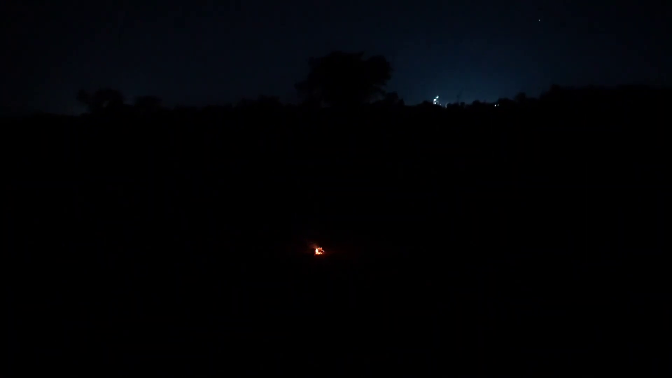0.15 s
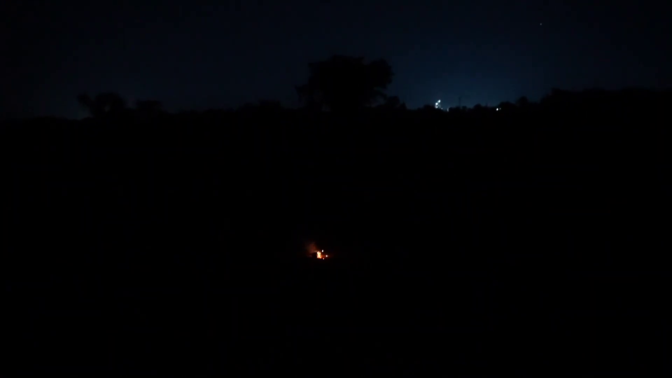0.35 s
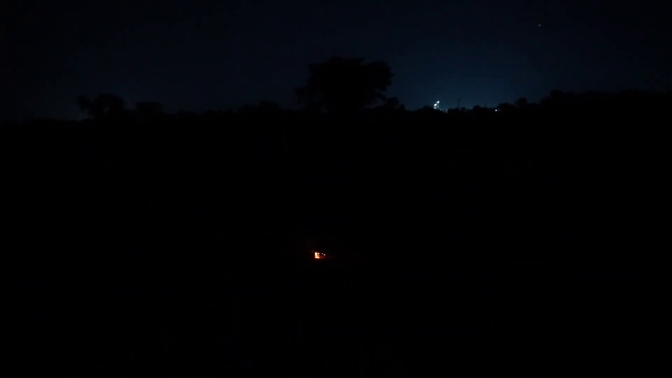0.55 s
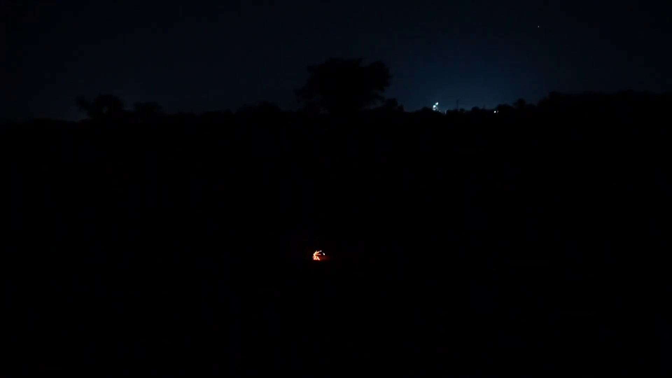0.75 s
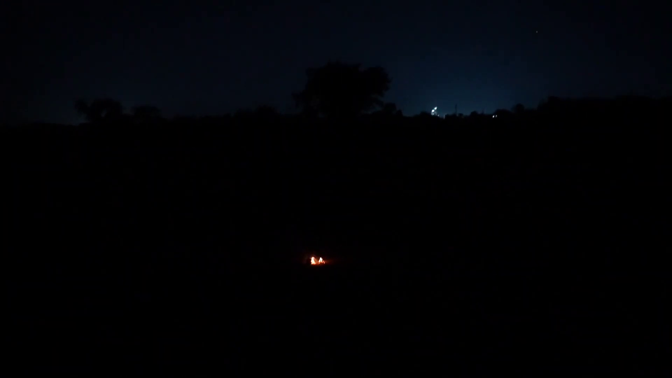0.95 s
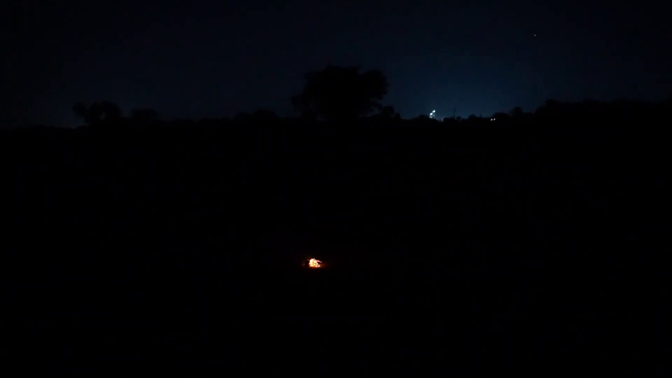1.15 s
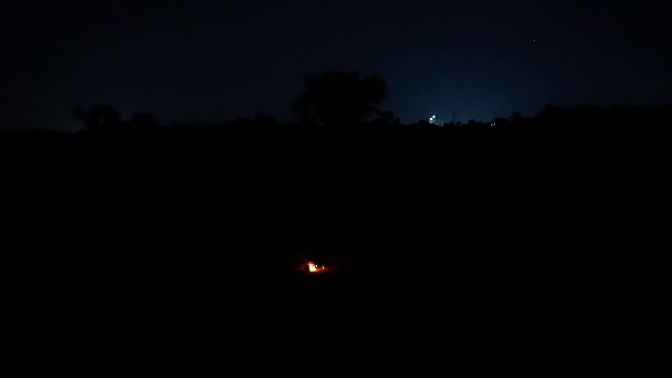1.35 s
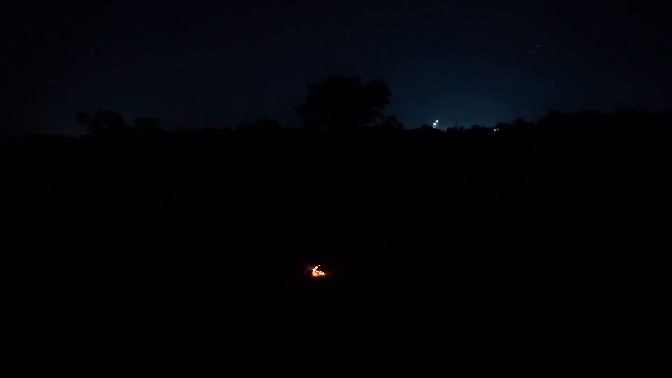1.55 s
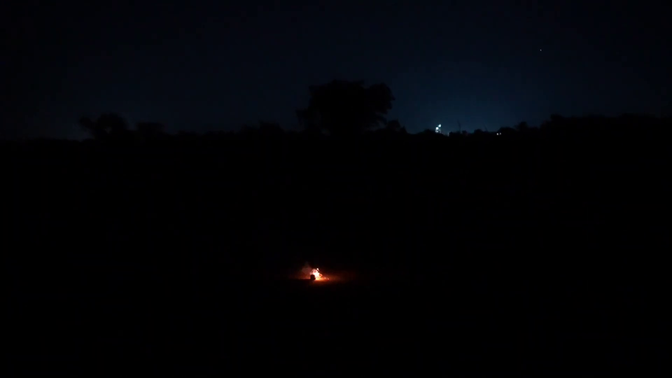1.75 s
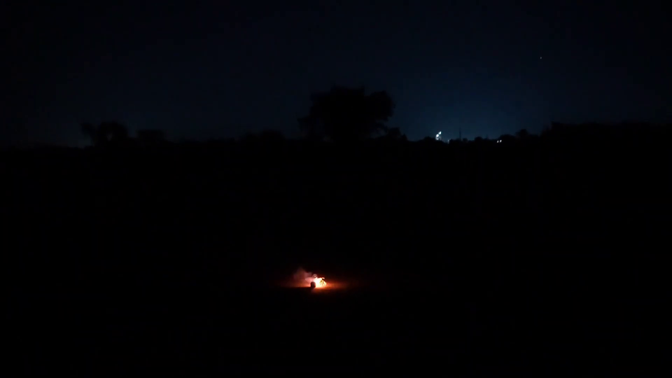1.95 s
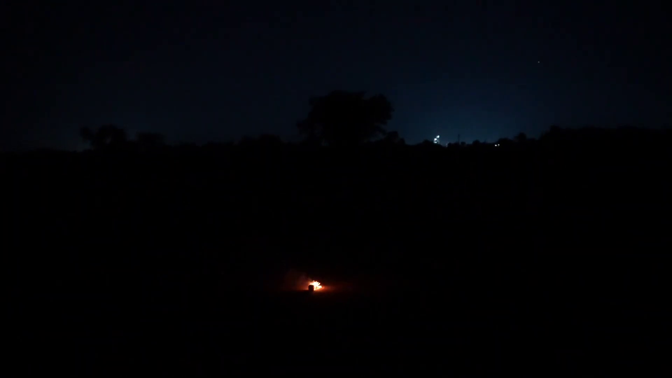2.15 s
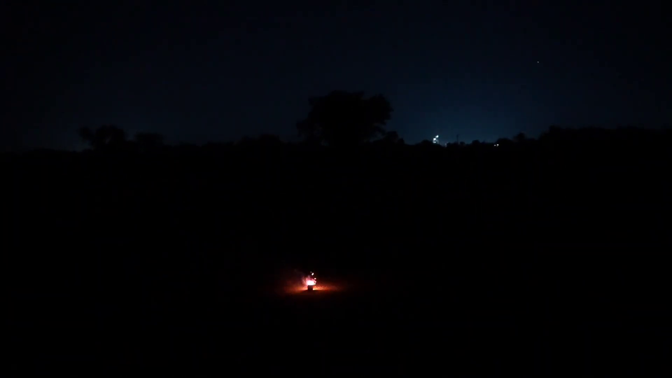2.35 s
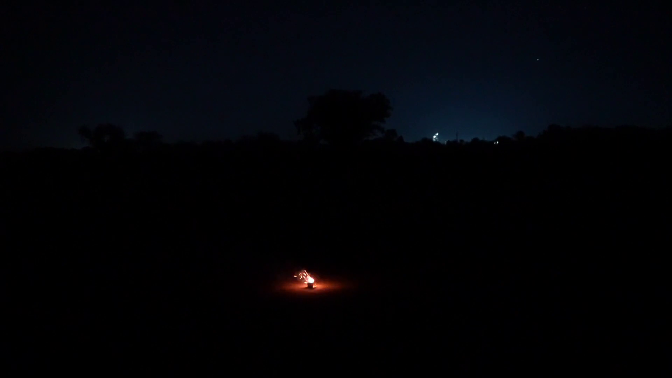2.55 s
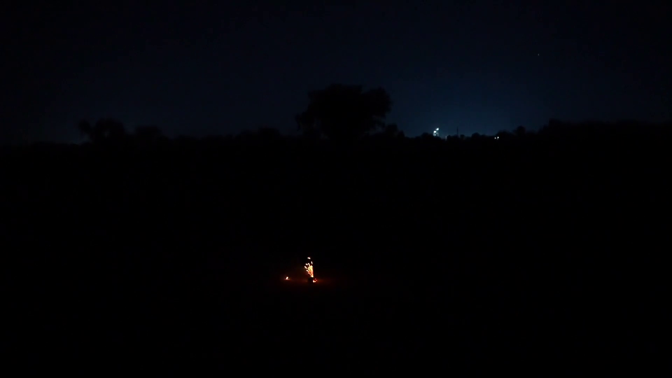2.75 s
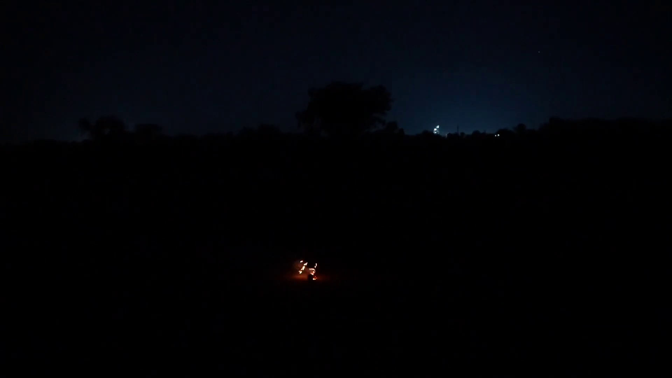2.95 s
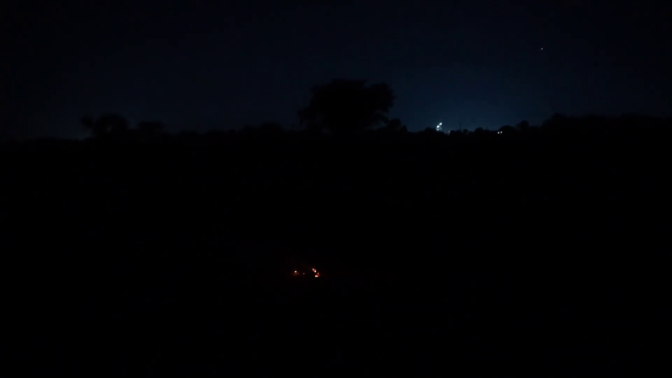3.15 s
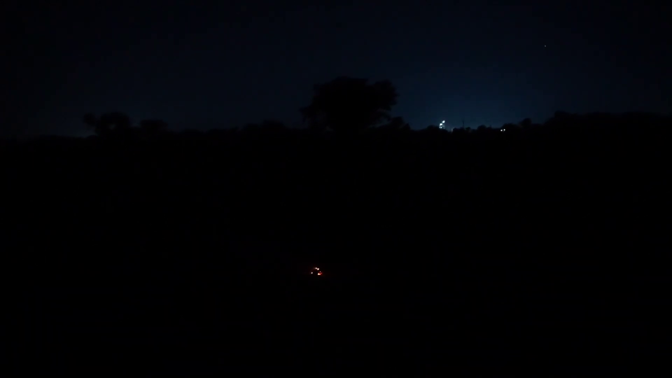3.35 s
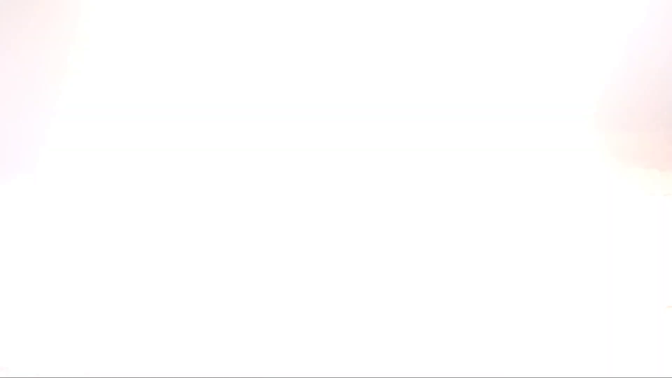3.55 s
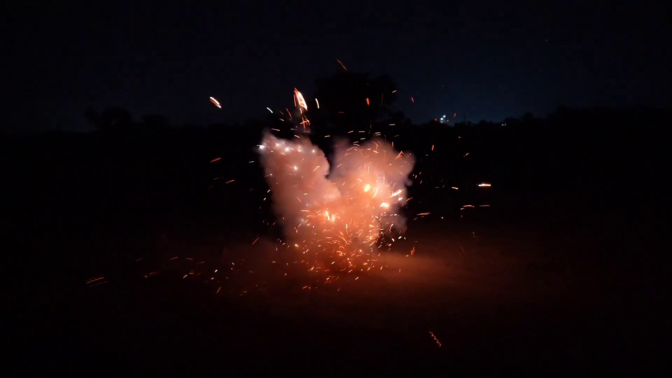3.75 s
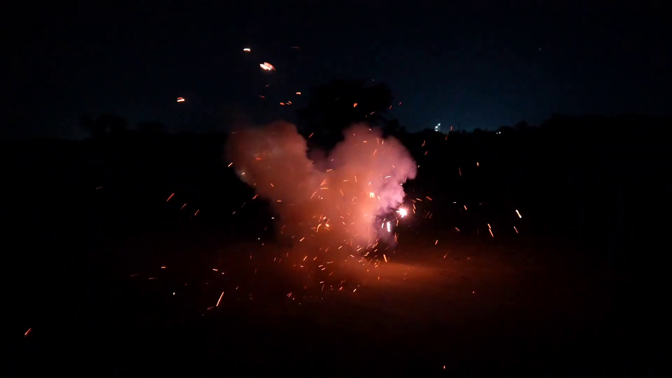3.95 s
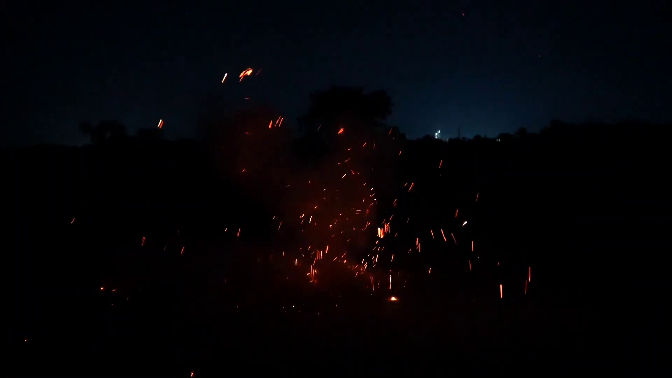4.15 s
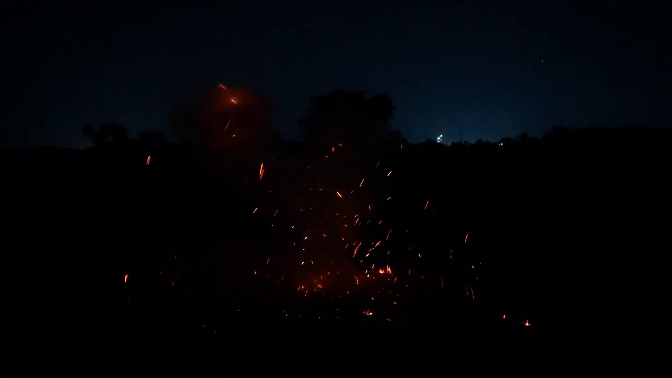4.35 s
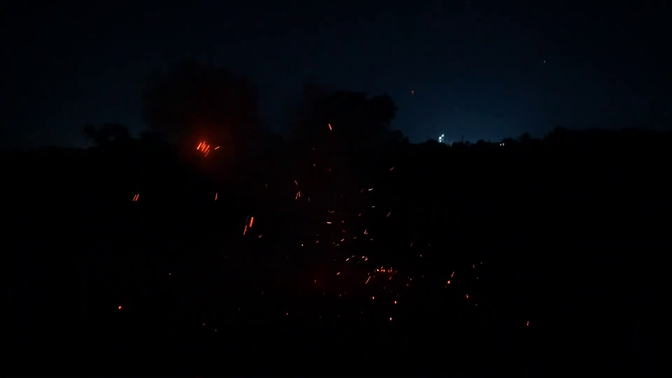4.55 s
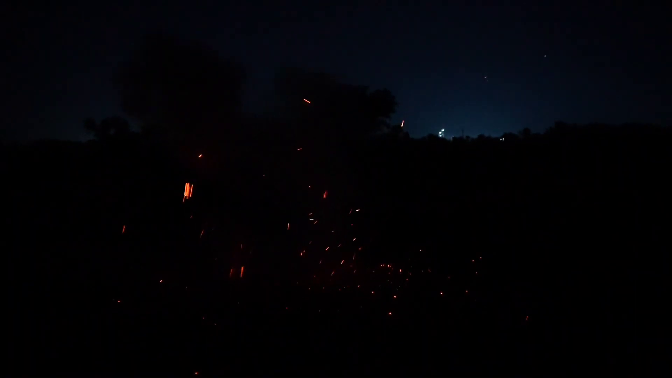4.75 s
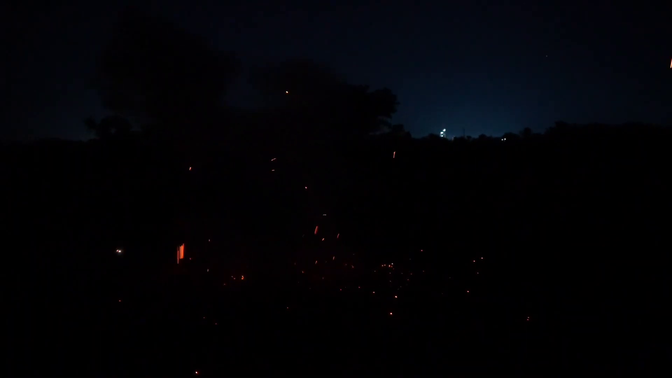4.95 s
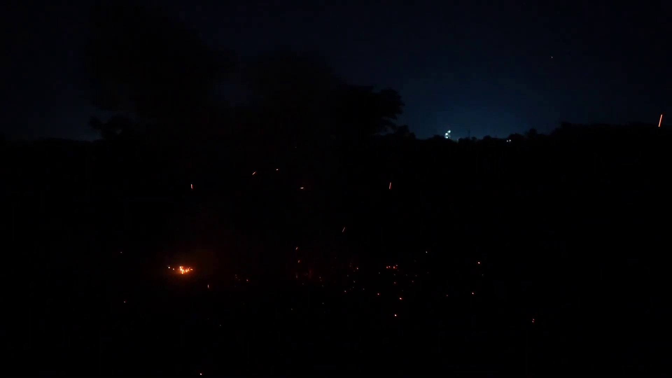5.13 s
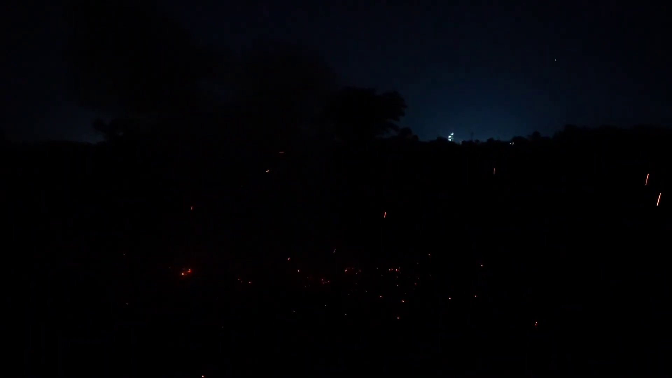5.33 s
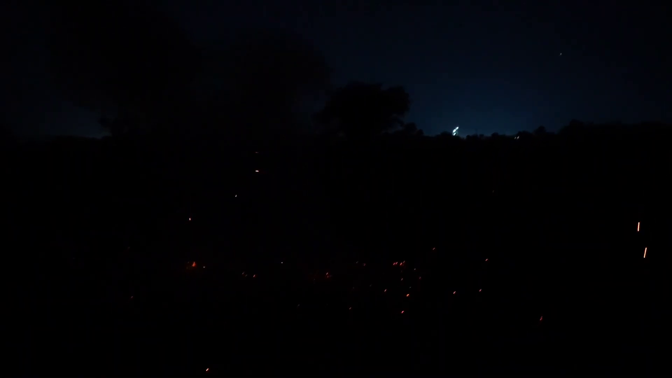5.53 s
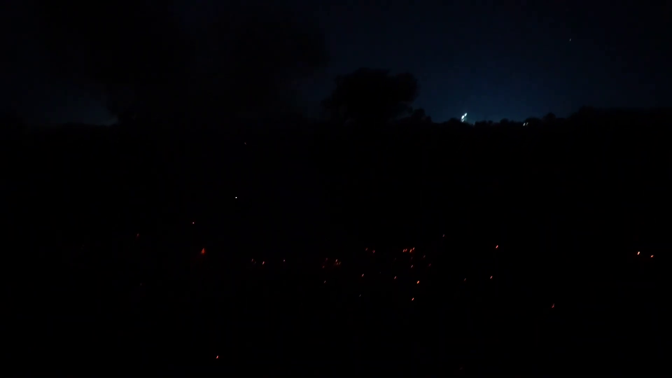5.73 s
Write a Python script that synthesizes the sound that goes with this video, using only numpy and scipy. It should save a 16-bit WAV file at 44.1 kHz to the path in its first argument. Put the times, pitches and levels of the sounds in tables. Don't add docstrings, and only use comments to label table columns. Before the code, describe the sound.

Outdoors at night, a fuse a few metres from a phone sputters with bright fizz, sharp spits and dull pops over a faint distant engine and trilling insects. It dwindles almost to nothing, then a firecracker explodes so loudly the microphone clips. Thuds, cracks and hiss return from across the open field, merging into a rumble that sinks and fades while embers snap close by.

```python
import sys
import numpy as np
from scipy import signal
from scipy.io import wavfile
from scipy.ndimage import uniform_filter1d

SR = 44100
rng = np.random.default_rng(int(sys.argv[2]) if len(sys.argv) > 2 else 0)


def wav_record(signal):
    frames = np.transpose(np.atleast_2d(signal))
    bounded = np.clip(frames, -1, 1)
    quanta = np.round(bounded * 32767).astype(np.int16)
    wavfile.write(sys.argv[1], SR, quanta)


def to_linear_factor(level_db):
    exponent = np.asarray(level_db, float) / 20
    return 10 ** exponent


N = 255466
T = np.arange(N) / SR
BOOM_S = 3.579
AFTER = np.maximum(T - BOOM_S, 0)


def curves(table):
    s, *columns = np.transpose(table)
    return [np.interp(T, s, c) for c in columns]


def band(x, hz, width, order=2):
    edges = [max(hz - width / 2, hz / 4), min(hz + width / 2, .45 * SR)]
    y = signal.sosfilt(signal.butter(order, edges, "band", fs=SR, output="sos"), x)
    return y / np.sqrt(np.mean(y ** 2))


def noise(hz, width, order=2):
    return band(rng.standard_normal(N), hz, width, order)


def walk(rate):
    k = int(SR / rate)
    held = np.repeat(rng.standard_normal(N // k + 1), k)
    return 0.66 * uniform_filter1d(held, k)[:N]


def add(out, s, shape):
    i = int(round(s * SR))
    out[i:i + len(shape)] += shape[:N - i]


def gate(s, length, edge):
    rise = 1 + np.exp(np.clip(-(T - s) / edge, -40, 40))
    fall = 1 + np.exp(np.clip((T - s - length) / edge, -40, 40))
    return 1 / rise / fall


def tick(hz, ms):
    t = np.arange(SR // 100) / SR
    return np.sin(2 * np.pi * hz * t) * np.exp(-t * 1000 / ms) * (1 - np.exp(-t * SR / 3.))


# t/s, level/dB
ENGINE_LEVEL = [(0, -52), (.5, -43.5), (1, -44), (1.6, -39.5), (2.2, -44), (2.9, -39.5), (3.5, -42),
                (5.8, -41)]
# t/s, f/Hz
FIRING_RATE = [(0, 19.2), (.6, 19.5), (1, 20.0), (1.6, 20.8), (2.2, 21.6), (2.9, 22.4), (3.5, 22.9),
               (5.8, 24.0)]
# f/Hz, width/Hz, level/dB
EXHAUST = [(76, 40, -10), (160, 30, 5), (207.9, 20, 0), (296, 78, -19)]


def engine():
    turns = 0.302 + np.cumsum(curves(FIRING_RATE)[0]) / SR
    fired = np.flatnonzero(np.diff(np.floor(turns)))
    chance = rng.standard_normal((len(fired), 2))
    late = (.0004 * SR * chance[:, 0]).astype(int)
    pulses = np.zeros(N)
    pulses[np.clip(fired + late, 0, N - 1)] = -to_linear_factor(1.2 * chance[:, 1])
    pipe = sum(to_linear_factor(db) * band(pulses, hz, width) for hz, width, db in EXHAUST)
    return to_linear_factor(curves(ENGINE_LEVEL)[0]) * pipe / pipe.std()


# f/Hz, level/dB per Hz
NIGHT_SPECTRUM = [(15, -43), (25, -15), (55, -2.5), (110, -8), (170, -0.5), (210, -7.5), (389, -18.5),
                  (598, -17), (1570, -47.5), (2490, -34), (3830, -48), (9550, -41.5), (15500, -48)]


def night():
    out = 0
    f, density_db = np.transpose(NIGHT_SPECTRUM)
    for hz in 25 * 2 ** np.arange(0, 9.4, .5):
        db = np.interp(np.log(hz), np.log(f), density_db) + 10 * np.log10(hz) + 3.3 * walk(6.14)
        out = out + to_linear_factor(db) * noise(hz, hz / 2.63)
    return to_linear_factor(-43) * out / out.std()


# f/Hz, wander/Hz, level/dB
INSECTS = [(2170, 65, -65.5), (3130, 90, -75), (3770, 170, -68)]


def insects():
    out = np.zeros(N)
    for hz, wander, db in INSECTS:
        tone = np.sin(2 * np.pi * np.cumsum(hz + wander * walk(200)) / SR)
        out += to_linear_factor(db + 2 * walk(45)) * (tone + .5 * noise(hz, 2 * wander))
    return out


# t/s, level/dB
FUSE = [(0, -63), (.06, -57), (.29, -52), (.71, -60), (.97, -56), (1.16, -63), (1.42, -51.5), (1.84, -68.5),
        (2.3, -70), (2.9, -81), (3.56, -75)]
# t/s, peak level/dB
SPITS = [(.1277, -33), (.1775, -38), (.3105, -34), (.396, -32), (.4543, -24), (.489, -29.5), (.5417, -35),
         (.574, -34), (.766, -34), (.8065, -31), (.849, -35), (.9722, -25.5), (1.0053, -29), (1.076, -29),
         (1.12, -34.5), (1.2692, -33), (1.3157, -43), (1.3263, -30.5), (1.4213, -30), (1.432, -30.5),
         (1.479, -44), (1.5509, -33), (1.735, -34), (1.96, -37), (2.2417, -39), (2.6484, -44),
         (2.6597, -31), (3.1983, -38), (3.252, -45)]
# t/s, peak level/dB, f/Hz
POPS = [(0.1272, -29, 1240), (0.779, -39, 1030), (0.849, -29.5, 1440), (0.971, -46, 2180),
        (1.006, -33, 1400), (1.3258, -25, 1200), (1.5673, -33, 1130), (2.8923, -40, 1180),
        (2.904, -32.5, 1300)]


def fuse():
    fizz_db = curves(FUSE)[0]
    surge = to_linear_factor(-44.5) * np.exp(np.minimum(T - BOOM_S, 0) / 0.017)
    hiss = to_linear_factor(-52.5 - 2.5 + 0.2 * (fizz_db + 59)) + surge
    chance = rng.random((N, 2))
    size_db = np.minimum(-5 * np.log(1 - chance[:, 1]), 15)
    sparks = (chance[:, 0] < 350 / SR) * to_linear_factor(size_db + 2 * walk(30))
    fizz = band(sparks, 8200, 2200) - .8 * band(sparks, 10700, 2800) + .6 * noise(8300, 3000)
    out = (to_linear_factor(fizz_db - 6.5) * fizz + hiss * noise(1130, 1670, order=1)) * (T < BOOM_S)
    out += to_linear_factor(-66 + 1.8 * walk(140)) * gate(3.40, .13, 0.013) * noise(10300, 2200)
    small = np.flatnonzero((rng.random(N) < 20 / SR) & (T < BOOM_S))
    spits = list(SPITS) + [(T[i], fizz_db[i] + 15) for i in small]
    port_hz = 8300 * (1 + .04 * rng.standard_normal(len(spits)))
    for (s, db), hz in zip(spits, port_hz):
        add(out, s, to_linear_factor(db + 3) * (tick(hz, .32) - .6 * tick(1.35 * hz, .2)))
    for s, db, hz in POPS:
        add(out, s, to_linear_factor(db) * (tick(hz, 0.45) + 0.85 * tick(3600, 0.19)))
    return out


# t/s, pressure step, relaxation/ms
SHOCKS = [(3.5781, .6, .7), (3.5794, 2.5, 4), (3.5815, -4, 3), (3.5829, 3.3, 1.1), (3.5847, -.9, 1.0),
          (3.5867, .95, .8), (3.5887, -.5, .6), (3.5911, -.6, 1.0), (3.5921, .8, .5), (3.5933, .4, .8),
          (3.5960, -.3, .6)]
# t/s, length/s, level/dB
TEARING = [(3.5745, .004, -28), (3.578, .0025, -21), (3.5811, .0009, 8), (3.5824, .0008, 3),
           (3.5885, .001, -16), (3.5905, .003, -24), (3.596, .0015, -24), (3.6003, .002, -22)]


def blast():
    out = np.zeros(N)
    t = np.arange(SR // 20) / SR
    for s, step, ms in SHOCKS:
        add(out, s, step * np.exp(-t * 1000 / ms) * (1 - np.exp(-t * SR / 3.)))
    tearing = sum(to_linear_factor(db) * gate(s, length, .0002) for s, length, db in TEARING)
    out += noise(6500, 11000) * tearing
    boom = np.sin(2 * np.pi * 55 * AFTER) * to_linear_factor(-29 - 60 * AFTER)
    return np.clip(out, -1.1, 1.1) + boom


def thud(hz, turns, steep=0):
    t = (np.arange(SR // 25) - SR // 50) / SR * hz
    octave = np.sin(4 * np.pi * t - .8) * np.exp(-(2 * t / turns) ** 2)
    wave = np.sin(2 * np.pi * t - .4) + steep * octave
    return wave * np.exp(-(t / turns) ** 2) * np.hanning(len(t)) ** 0.93


# t/s, peak level/dB, f/Hz
THUDS = [(3.6009, -3, 334), (3.621, -3, 360), (3.6514, -1, 390), (3.6977, -3, 446), (3.7126, -14, 287),
         (3.7395, -7, 220), (3.77, -0.5, 260), (3.7915, -3, 300), (3.836, -3, 240), (3.8516, -11, 210),
         (3.8677, -5, 274), (3.886, -5, 164), (3.9016, -6.5, 257), (3.9278, -10.5, 260), (3.9566, -7, 202),
         (3.9693, -6, 210), (3.9878, -2.5, 255), (4.0527, 0.8, 200), (4.0774, -5, 255), (4.116, -9.5, 183),
         (4.185, -14.5, 221), (4.2956, -12.5, 197), (4.3356, -18, 232), (4.399, -3.5, 177),
         (4.5528, -17.5, 228), (4.7114, -18, 141), (5.0158, -20.5, 176), (5.137, -19, 160),
         (5.152, -20, 160), (5.309, -23, 142)]


def thuds():
    out = np.zeros(N)
    for s, db, hz in THUDS:
        steep = 0.55 * np.exp((BOOM_S - s) / 0.24)
        add(out, s - .02, to_linear_factor(db) * thud(hz, 0.63, steep))
    return out


# t/s, length/s, level/dB, brightness/dB per band
TREES = [(3.597, 0.056, -30.5, -5), (3.65, 0.064, -35.5, -9.5), (3.726, 0.02, -29.5, 3),
         (3.774, 0.023, -29.5, -6), (3.832, 0.0058, -47.5, 15.5), (3.864, 0.012, -49, 1),
         (3.901, 0.028, -39, -1.5), (4.017, 0.052, -37, -3.5), (4.095, 0.043, -48, -3.5),
         (4.141, 0.049, -53, -9), (4.311, 0.037, -53, -5.5), (4.379, 0.04, -53.5, -9),
         (4.467, 0.042, -57.5, -12), (4.89, 0.444, -68.5, -11), (5.118, 0.032, -62, -13)]
# f/Hz, width/Hz, near scrub level/dB, its t60/s, far woods level/dB, drift/dB per s
SCATTER = [
    (1016, 716, -26.5, 1.29, -54, 2.5),
    (2660, 1520, -28, 1.05, -54, -2.5),
    (5700, 3700, -29.5, 1.19, -73, 4),
]


def trees():
    out = np.zeros(N)
    chance = rng.random((N, 2))
    clicks = (chance[:, 0] < 1500 / SR) * to_linear_factor(np.minimum(-4 * np.log(1 - chance[:, 1]), 11))
    grit = clicks / clicks.std() + .6 * rng.standard_normal(N)
    gusts = 2.5 * walk(60)
    started = gate(3.604, 9, 0.0016)
    rise = np.minimum(AFTER / .09 / 2, 1) ** 2
    for k, (hz, width, near_db, t60, far_db, drift_db) in enumerate(SCATTER):
        crowns = sum(to_linear_factor(db + (k - 1) * bright_db) * gate(s, length, 0.0024)
                     for s, length, db, bright_db in TREES)
        field = to_linear_factor(near_db - 60 * AFTER / t60) * rise + to_linear_factor(far_db + drift_db * AFTER)
        hiss = band(grit, hz, width)
        if k == 2:
            hiss = hiss - to_linear_factor(-2.5 - 11 * AFTER) * band(grit, 10000, 6000)
        clumps = to_linear_factor(gusts + 1.8 * walk(35))
        out += (-1) ** k * hiss * clumps * (crowns + started * field)
    return out


def swarm(start, length, pitch, octaves, count):
    out = np.zeros(N)
    for when, size, tune, sign in rng.random((count, 4)):
        s = start + length * when
        hz = pitch[min(int(s * SR), N - 1)] * 2 ** (octaves * (tune - .5))
        add(out, s - .02, np.sign(sign - .5) * to_linear_factor(8 * size) * thud(hz, turns=.9))
    return out / out[int(start * SR):int((start + length) * SR)].std()


# t/s, level/dB
RUMBLE = [(3.61, -18.5), (3.72, -7.5), (3.8, -15), (4.0, -19.5), (4.24, -27), (4.42, -21.5), (4.56, -29),
          (5.15, -34.5), (5.6, -42)]


def rumble():
    pitch = 177.3 + (338 - 177.3) * np.exp(-AFTER / 0.37)
    out = to_linear_factor(curves(RUMBLE)[0]) * swarm(3.6, 2.19, pitch, octaves=1.33, count=1500)
    sinking = 684 * np.exp(-AFTER / 0.64)
    out += to_linear_factor(-13.5 - 60 * AFTER) * swarm(3.6, 0.46, sinking, octaves=0.32, count=500)
    hills = swarm(3.7, 2.09, np.full(N, 92.), octaves=1.0, count=160)
    out += to_linear_factor(-26.5 - 60 * AFTER / 4.36) * hills
    return gate(3.604, 9, 0.0016) * out


# t/s, peak level/dB, f/Hz, treble level/dB
CRACKS = [(3.792, 3.5, 930, 3), (3.902, -3.5, 921, -2), (3.918, -11.5, 1360, -6), (3.95, -5, 696, 1),
          (3.966, -8.5, 695, 2), (3.985, -16, 1270, 13.5), (3.995, -17, 988, 1), (4.051, -12, 790, 10),
          (4.078, -9, 910, 1.5), (4.114, -9.5, 696, -7), (4.203, -29.5, 3600, 8),
          (4.241, -21.5, 1150, -1.5), (4.473, -30, 900, -2), (4.705, -27, 959, -8), (4.83, -34, 2200, -6),
          (4.887, -19, 870, -32), (4.957, -22.5, 1080, -18)]


def cracks():
    out = np.zeros(N)
    t = np.arange(SR // 100) / SR
    for s, db, hz, treble_db in CRACKS:
        spray = uniform_filter1d(rng.standard_normal(len(t)), size=4)
        spray = uniform_filter1d(spray, size=3) * np.exp(-t / .0025)
        splinter = .6 * tick(2600, .25) + .3 * spray
        add(out, s, to_linear_factor(db) * (tick(hz, 0.54) + to_linear_factor(treble_db) * splinter))
    return out


# t/s, peak level/dB, f/Hz
EMBERS = [(4.532, -35.5, 7250), (4.632, -45, 9000), (4.663, -41, 8550), (4.742, -41, 8950),
          (4.801, -41, 11000), (4.83, -45, 10940), (5.0304, -17, 8300), (5.0404, -4, 8400),
          (5.0426, -11, 8800), (5.0465, -37, 9400), (5.048, -37, 9000), (5.0866, -36, 7860),
          (5.354, -41, 8100), (5.46, -42, 9800), (5.7303, -33.5, 5960)]


def embers():
    out = to_linear_factor(-60.5 + 3.0 * walk(75)) * gate(5.58, 0.71, 0.12) * noise(10400, 3000)
    for s, db, hz in EMBERS:
        add(out, s, to_linear_factor(db + 6.5) * (tick(hz, 0.23) - 0.6 * tick(1.47 * hz, .2)))
    return signal.sosfilt(signal.butter(2, 5000, "high", fs=SR, output="sos"), out)


def houses():
    farm = to_linear_factor(-53) * gate(4.93, 0.22, .03)
    village = to_linear_factor(-44) * gate(5.47, 9, 0.016)
    return (farm + village) * swarm(4.8, .99, np.full(N, 576.), octaves=1.4, count=800)


def echoes():
    out = thuds() + trees() + rumble() + cracks() + houses()
    below = signal.sosfiltfilt(signal.butter(3, 12300, fs=SR, output="sos"), out)
    return below + (out - below) * to_linear_factor(2 - 35.5 * AFTER)


def scene():
    return (engine() + night() + insects() + fuse() + blast() + echoes() + embers())[None]


def low_pass(x):
    return signal.sosfilt(signal.butter(12, 16520, fs=SR, output="sos"), x)


# f/Hz, width/Hz, depth (0-1)
CASE_DIPS = [(1622, 750, 0.23), (3800, 265, 0.07), (6300, 360, 0.01)]


def record(dry):
    x = signal.sosfilt(signal.butter(2, 25, "high", fs=SR, output="sos"), dry)
    for hz, width, depth in CASE_DIPS:
        x = x - depth * signal.lfilter(*signal.iirpeak(hz, hz / width, fs=SR), x)
    x = .78 * np.tanh(1.4 * x)
    x = signal.sosfilt(signal.butter(1, 16000, fs=SR, output="sos"), x)
    mix = signal.sosfilt(signal.ellip(8, .3, 45, 15700, fs=SR, output="sos"), x)
    return low_pass(mix)


dry = scene()
out = record(dry)
wav_record(out)
```